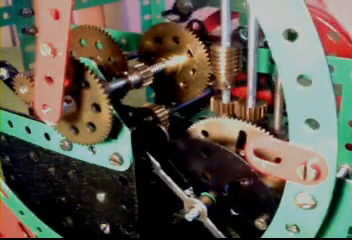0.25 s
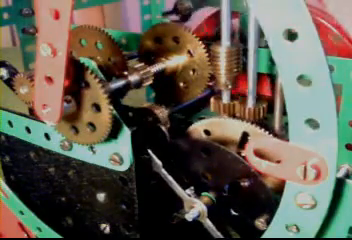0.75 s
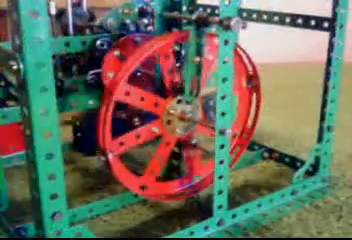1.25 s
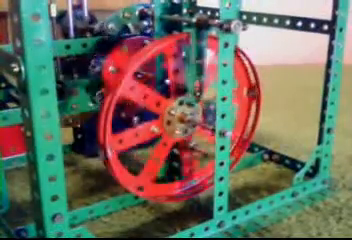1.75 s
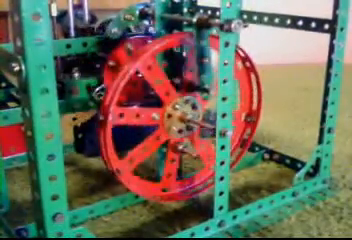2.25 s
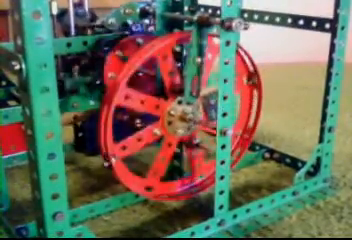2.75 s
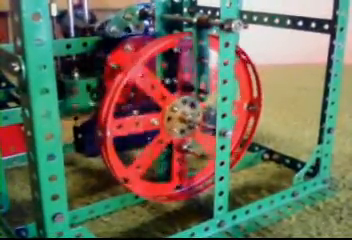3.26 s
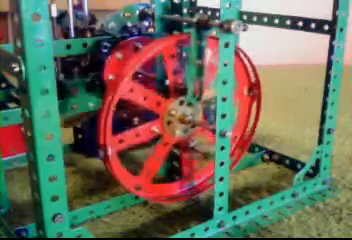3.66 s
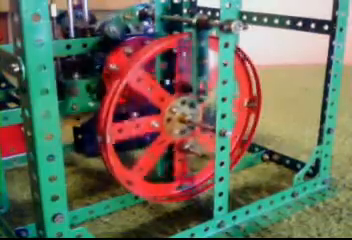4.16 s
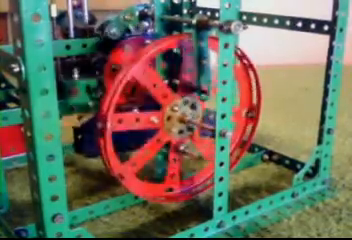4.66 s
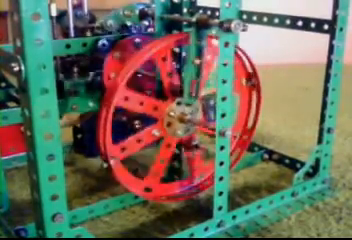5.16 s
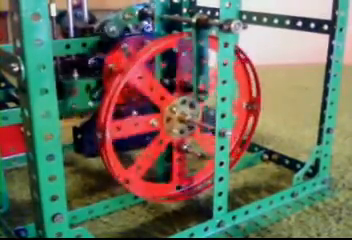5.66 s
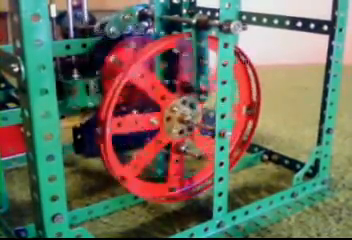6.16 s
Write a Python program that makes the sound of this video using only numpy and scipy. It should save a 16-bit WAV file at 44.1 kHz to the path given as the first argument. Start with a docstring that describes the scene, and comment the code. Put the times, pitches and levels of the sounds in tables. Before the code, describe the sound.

A clock built of bolted steel strips ticks in a quiet carpeted room. Two louder, close ticks come first, then a soft pop and a third of a second of complete silence. The sound resumes from further away, with about two or three beats a second, slightly uneven, each a sharp metallic clack with tiny rebounding clicks, over faint hiss and hum.

```python
"""A quiet carpeted room, where a model clock of bolted steel strips ticks.
At each swing of the balance wheel a pallet scrapes free, catches the escape wheel and rebounds.
Each touch sets off a pallet tink, decaying plate noise, ringing steel modes and a low frame thump.
Shaped noise makes the room air; narrow resonances fed with noise make a faint hum and whine.
The recorder runs close by, stops for a moment and starts again further away."""
import sys
import numpy as np
from scipy import signal
from scipy.io import wavfile

SR = 44100
rng = np.random.default_rng(int(sys.argv[2]) if len(sys.argv) > 2 else 0)


def master(y):
    """Save y as 16-bit WAV."""
    cut = np.clip(np.atleast_2d(y).T, -1, 1)
    pcm = np.round(cut * 32767)  # scale
    wavfile.write(sys.argv[1], SR, pcm.astype(np.int16))


N = 283122
TIME = np.arange(N) / SR
STOP_S, RESTART_S = .8795, 1.178   # the recorder's pause
CUTOFF_HZ = 15200   # top of the recorder's range
REBOUND_SHRINK = 0.7   # second flight of a rebound as a share of the first

# ringing modes of the wheels and strips: pitch_hz, entry_pallet_db, exit_pallet_db
STEEL_MODES = [(1130, -11, -10), (1198, -9, -10), (1323, -4, -5), (1397, -12, -9), (1642, -4, -9),
               (1715, -8, -11), (2373, -4, -10), (2543, -5, -7), (2790, -6, -3), (2877, -9, -7),
               (3420, -6, -7), (3483, -8, -8), (3798, -3, -2), (3935, -3, -9), (4135, 0, -6),
               (4282, -3, -7), (4390, -1, -2), (4471, -2, -7), (4826, -6, -9), (5148, -4, -7),
               (5928, -4, -6), (6255, -8, -7), (6406, -4, -18), (6680, -4, -2), (7275, -5, -7),
               (8530, -11, -18), (8695, -9, -17), (9420, -14, -19)]
# short tink of the pallet itself: pitch_hz, level_db
PALLET_MODES = [(3800, -9), (4350, -4), (5300, -9), (6000, -9), (6800, -10)]
# bending modes of the whole frame: pitch_hz, level_db, t60_s
FRAME_MODES = [(139, -23, .15), (170, -14.5, .22), (237, -14, .25), (325, -22, .12), (376, -20, .2),
               (565, -24, .15)]
# colour of the dense plate ringing under the entry pallet: pitch_hz, relative_db_per_hz
ENTRY_COLOUR = [(200, -9), (900, -8), (1400, -3), (2200, -2), (3200, 0.5), (4200, 3.5), (5500, 0),
                (6900, 4), (8000, -4.5), (9400, -21), (10200, -36.5), (11800, -36), (13000, -13),
                (15000, -23.5)]
# the same under the exit pallet: pitch_hz, relative_db_per_hz
EXIT_COLOUR = [(200, -5), (900, -6), (1400, -5.5), (2200, -3), (2900, 4), (4200, 2), (5500, 2), (6900, 0),
               (8000, 0), (9400, -29.5), (10200, -29), (11800, -22), (13000, -13.5), (15000, -30.5)]
# colour of the steady room air with microphone hiss: pitch_hz, relative_db_per_hz
AIR_COLOUR = [(25, -7), (60, -0.5), (100, 0), (200, 2.5), (400, -0.5), (800, -2), (1300, -5.5), (2000, -6),
              (4000, -10), (7000, -14.5), (9300, -19.5), (10200, -52.5), (11500, -38.5), (13000, -60.5)]
# faint hum and whine, levels as heard from further away: pitch_hz, level_db, width_hz
TONES = [(48.4, -71.5, 1.5), (151, -76, 3), (565, -77.5, 3), (1127, -71, 4), (1318, -77, 12),
         (2444, -81, 25)]
# side level of the noise, stronger towards the treble: pitch_hz, side_minus_mid_db
WIDTH = [(150, -65), (350, -54.5), (700, -53.5), (1400, -44.5), (5000, -29.5), (9000, -23), (13000, -8.5)]
# slowly settling offset of the recorder's input: time_s, offset (full scale = 1)
INPUT_OFFSET = [(0, -.0258), (.88, -.0258), (1.17, .0026), (6.42, -.0007)]
# beats of the escapement, exit and entry pallet in turn, before each layer's own level:
# start_s, level_db, rebound_after_s, then relative to the beat: rebound_db, second_rebound_db, unlock_db
BEATS = [(0.2201, -30.5, 0.02, -3, -13, -12), (.572, -27.5, 0.036, -6, -19, -20),
         (1.2241, -37, 0.035, -2, -20, -18), (1.587, -31, .022, -4.5, -16, -29),
         (1.977, -36.5, .026, -1.5, -4, -22), (2.4160, -32.5, 0.025, -2, -22, -20),
         (2.778, -35, 0.027, -1, -20, -24), (3.217, -35, .030, -5, -17, -24),
         (3.577, -34.5, .018, -5.5, -20, -15), (4.039, -32, .0365, -13, -24, -18),
         (4.3916, -34.5, .021, -4, -15, -14), (4.832, -34.5, .033, -6.5, -31, -16),
         (5.2065, -38, 0.027, 1, -17, -18), (5.548, -31.5, .016, -23, -10, -28),
         (5.9425, -36.5, 0.034, -8, -17, -22), (6.368, -32, .016, -16, -22, -32)]
# how each pallet, entry then exit, is knocked free and takes up the slack of the gear train:
# unlock_before_s, graze_before_s, graze_db, first_gap_s, gap_growth (power), loss_per_touch_db
PALLETS = [(.011, .0028, -3.5, .0037, 1.5, 2.5), (.030, .0020, -11.5, .0028, 1.65, 2)]


def from_db(db):
    """Decibels to gain."""
    return 10 ** (np.asarray(db) / 20)


def rms_one(x):
    """Scale to rms 1."""
    return x / np.sqrt(np.mean(x ** 2) + 1e-20)


def at_hz(points, hz):
    """Read a spectrum on a log-frequency axis."""
    point_hz, point_db = np.array(points).T
    return np.interp(np.log(hz), np.log(point_hz), point_db)


def clicks(times, heights):
    """Single-sample pulses at the given times, over a vanishingly small floor."""
    return np.bincount(np.round(times * SR).astype(int), heights, N)[:N] + 1e-18


def ring(force, hz, t60):
    """A damped resonance: a unit click sets a sine of height 1 ringing."""
    radius = from_db(-60 / (t60 * SR))
    angle = 2 * np.pi * hz / SR
    return signal.lfilter([0, np.sin(angle)], [1, -2 * radius * np.cos(angle), radius * radius], force)


def fade(energy, t60):
    """Energy put in dies away exponentially, 60 dB in t60 seconds."""
    return signal.lfilter([1], [1, -np.exp(-np.log(1e6) / (t60 * SR))], energy)


def band_pass(x, order, low_hz, high_hz):
    """Keep only the range between two frequencies."""
    return signal.sosfilt(signal.butter(order, [low_hz, high_hz], "band", fs=SR, output="sos"), x)


def noise_bands():
    """Stereo noise in adjoining bands, in finer steps up the treble: (centre Hz, noise)."""
    edges = np.r_[np.geomspace(20, 2000, 11)[:-1], np.geomspace(2000, 16000, 18)]
    white = rng.standard_normal((2, 2, N))
    for k, (low, high) in enumerate(zip(edges, edges[1:])):
        hz = np.sqrt(low * high)
        # neighbouring bands draw on separate noise
        mid, side = band_pass(white[k % 2], 3, low, high)
        yield hz, mid + from_db(at_hz(WIDTH, hz)) * side * np.array([[1], [-1]])


def background(air_db=-55.5, close_db=5.5):
    """Room air and wavering noise-driven tones, louder while the microphone is close."""
    air = rms_one(sum(from_db(at_hz(AIR_COLOUR, hz)) * noise for hz, noise in noise_bands()))
    tones = np.zeros(N)
    for hz, db, width_hz in TONES:
        t60 = np.log(1000) / (np.pi * width_hz)
        tones += from_db(db) * rms_one(ring(rng.standard_normal(N), hz, t60))
    return (from_db(air_db) * air + tones) * from_db(close_db * (TIME < STOP_S))


def grain(depth_db, grain_s):
    """Uneven gain of tiny contacts following one another; rms 1."""
    knots = np.interp(TIME / grain_s, np.arange(N), rng.standard_normal(N))
    return rms_one(from_db(depth_db * np.clip(knots, -2, 2)))


def unlocking(level_db=-68.0, slide_s=0.07, low_hz=3000, high_hz=8500):
    """Just before each beat the pallet slides off its tooth with a faint, grainy scrape."""
    sliding = sum((TIME > s - slide_s) & (TIME < s) for s, *_ in BEATS)
    friction = rng.standard_normal(N) * grain(depth_db=7.0, grain_s=0.0036) * sliding
    scrape = band_pass(friction, 6, low_hz, high_hz)
    # the level holds for the sliding moments, not the silence between
    return from_db(level_db) * rms_one(scrape) * np.sqrt(sliding.mean())


def beat(s, db, rebound_s, rebound_db, second_db, unlock_db, pallet, count=4):
    """An unlocking click, a graze, a run of ever weaker touches, two rebounds: rows (s, dB, pallet)."""
    unlock_s, graze_s, graze_db, gap_s, growth, loss_db = PALLETS[pallet]
    approach = [(-unlock_s, unlock_db), (-graze_s, graze_db)]
    landing = [(gap_s * k ** growth, -loss_db * k) for k in range(count)]
    rebounds = [(rebound_s, rebound_db), (rebound_s * (1 + REBOUND_SHRINK), second_db)]
    touches = approach + landing + rebounds
    return [(s + after_s, db + touch_db, pallet) for after_s, touch_db in touches]


def contacts():
    """All touches of the alternating pallets: rows (s, level dB, pallet 0 = entry or 1 = exit)."""
    return np.array([touch for k, row in enumerate(BEATS) for touch in beat(*row, pallet=(k + 1) % 2)])


def strikes(level_db, spread_db):
    """Each contact drives a mode with a random strength and direction of its own."""
    s, db, _ = contacts().T
    strength, direction = rng.standard_normal((len(s), 2)).T
    return clicks(s, from_db(db + level_db + spread_db * strength) * np.sign(direction))


def snap(pallet_t60=0.0074, stiffening=0.24, low_hz=2900, high_hz=7000):
    """Sharp tink of the heavily damped pallet: prouder on hard blows, its colour varying by touch."""
    db = contacts()[:, 1]
    force_db = stiffening * (db - np.median(db))   # extra dB per dB of blow
    tink = np.zeros(N)
    for hz, mode_db in PALLET_MODES:
        tink += ring(strikes(force_db + mode_db, spread_db=7.5), hz, pallet_t60)
    return band_pass(tink, 4, low_hz, high_hz)


def clatter(level_db=1.0, plate_db=-5.0, room_db=-26.0, spread_s=.0005,
            crack_t60_at_4k=0.031, plate_t60_at_4k=0.12, low_linger=0.39,
            room_t60_low=0.64, damping_hz=10000, hardening=0.93):
    """Crowded plate modes as noise: a crack, a short buzzing ring and a faint room tail."""
    s, db, pallet = contacts().T
    loose_joints = grain(depth_db=2.5, grain_s=.0008)
    rise = np.exp(-1 / (spread_s * SR))
    out = np.zeros((2, N))
    for hz, noise in noise_bands():
        colour_db = np.where(np.round(pallet) == 1, at_hz(EXIT_COLOUR, hz), at_hz(ENTRY_COLOUR, hz))
        # a harder blow is brighter at the very top of the treble
        octaves_above = max(np.log2(hz / 9000), 0)
        bright_db = hardening * (db - np.median(db)) * octaves_above
        energy = clicks(s, from_db(level_db + db + colour_db + bright_db) ** 2)
        # the lows of crack and plates last longer
        linger = (4000 / hz) ** low_linger
        crack = fade(energy, crack_t60_at_4k * linger)
        plates = from_db(plate_db) ** 2 * fade(energy, plate_t60_at_4k * linger)
        # carpet and air swallow the top of the room tail
        room_t60 = room_t60_low / (1 + (hz / damping_hz) ** 6)
        tail = from_db(room_db) ** 2 * fade(energy, room_t60)
        envelope = np.sqrt((crack + plates) * loose_joints ** 2 + tail)
        # the blow takes a moment to spread through the plates
        out += noise * signal.lfilter([1 - rise], [1, -rise], envelope)
    return out


def steel(level_db=-14.5, t60_at_3k=0.098, high_damping=0.33, per_octave_db=1.0):
    """Wheels and strips ring briefly; the two pallets favour different modes."""
    exit_pallet = contacts()[:, 2] == 1
    out = np.zeros(N)
    for hz, entry_db, exit_db in STEEL_MODES:
        tilt_db = per_octave_db * np.log2(hz / 3000)
        mode_db = np.where(exit_pallet, exit_db, entry_db) + tilt_db
        t60 = t60_at_3k * (3000 / hz) ** high_damping
        out += ring(strikes(level_db + mode_db, spread_db=1.5), hz, t60)
    return out


def frame(level_db=-8.5, recoil_s=.028, recoil_db=-1.0, close_db=5.0):
    """The frame thumps softly at each blow and again as the gear train recoils; fuller close by."""
    out = np.zeros(N)
    for hz, db, t60 in FRAME_MODES:
        blow = strikes(level_db + db, spread_db=1.0)
        recoil = strikes(level_db + db + recoil_db, spread_db=1.0)
        delayed_recoil = np.r_[np.zeros(round(recoil_s * SR)), recoil][:N]
        out += ring(blow + delayed_recoil, hz, t60)
    return out * from_db(close_db * (TIME < STOP_S))


def scene():
    """The clock stands straight ahead of the microphone, in the air of the room."""
    return background() + unlocking() + snap() + clatter() + steel() + frame()


def record(dry):
    """The recorder pauses, its input offset dropping away with a soft pop; the top is cut."""
    running = (TIME < STOP_S) | (TIME >= RESTART_S)
    offset = np.interp(TIME, *np.transpose(INPUT_OFFSET))
    taken = (dry + offset) * running
    return signal.sosfilt(signal.ellip(8, .1, 80, CUTOFF_HZ, fs=SR, output="sos"), taken)


dry = scene()
out = record(dry)
master(out)
```